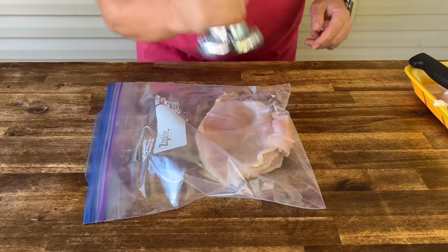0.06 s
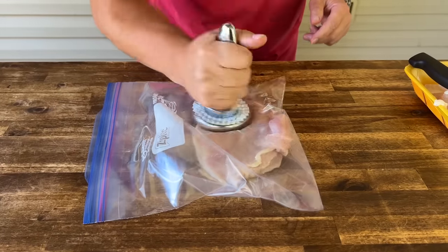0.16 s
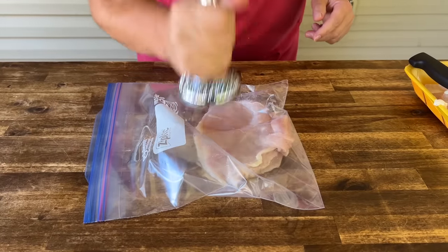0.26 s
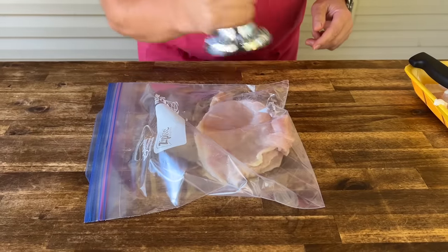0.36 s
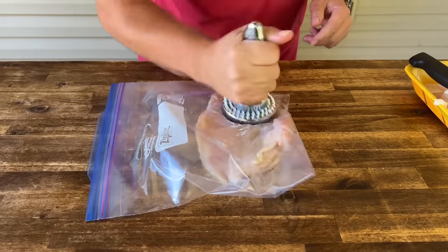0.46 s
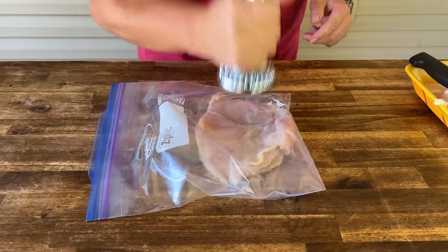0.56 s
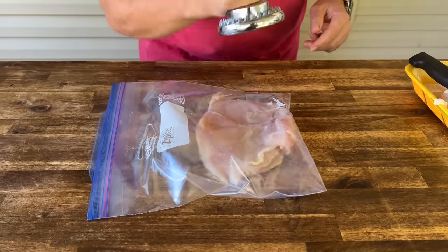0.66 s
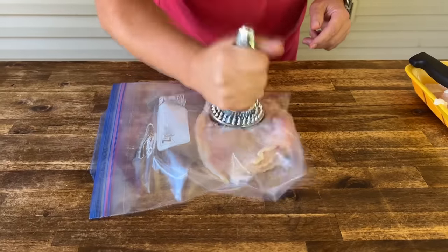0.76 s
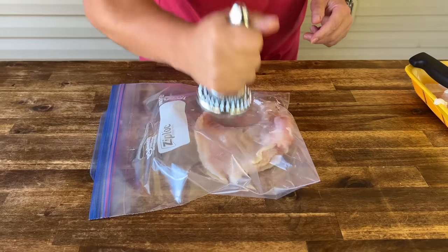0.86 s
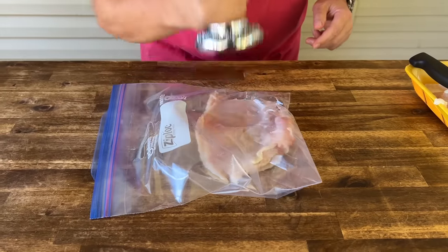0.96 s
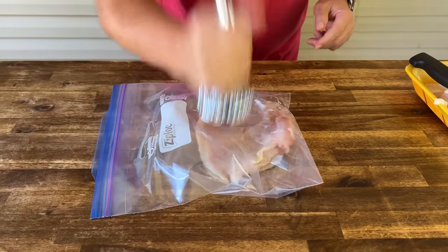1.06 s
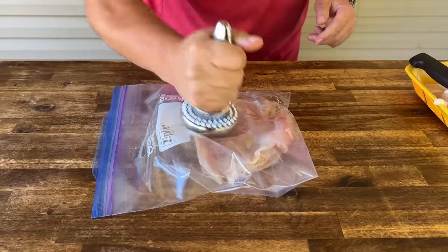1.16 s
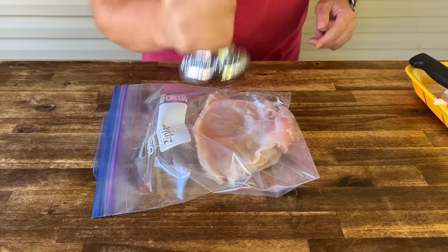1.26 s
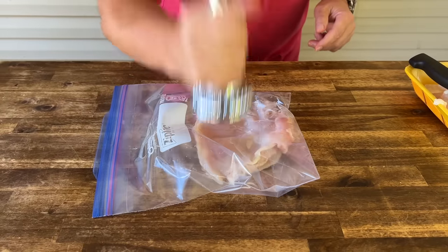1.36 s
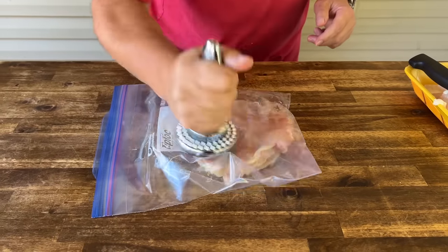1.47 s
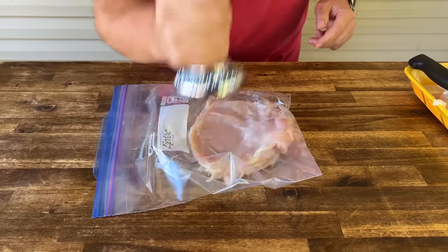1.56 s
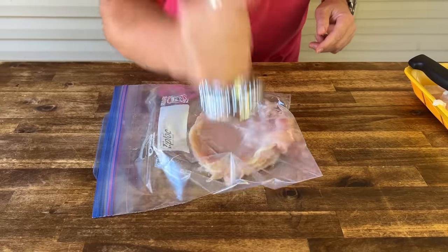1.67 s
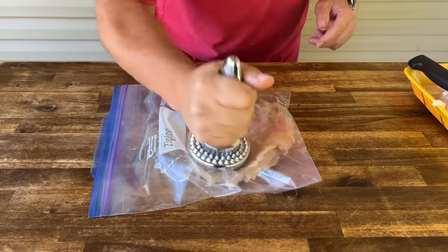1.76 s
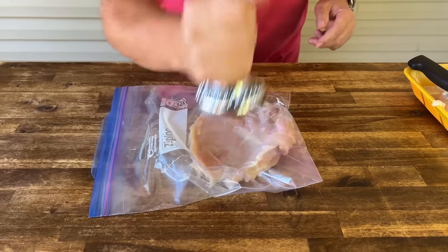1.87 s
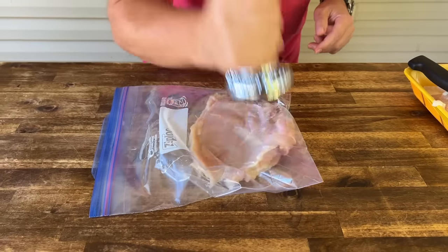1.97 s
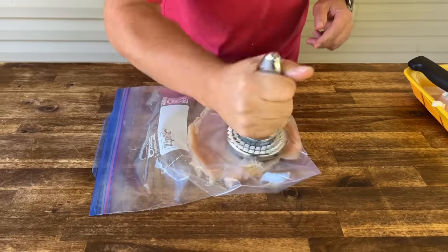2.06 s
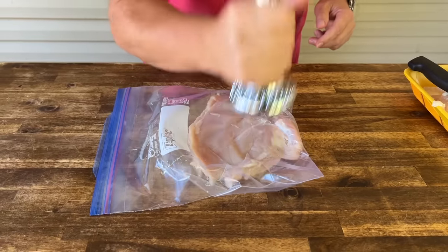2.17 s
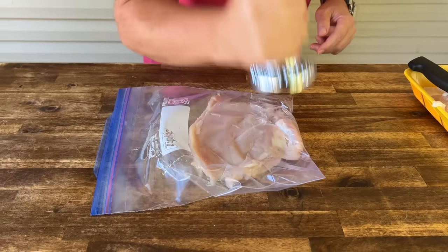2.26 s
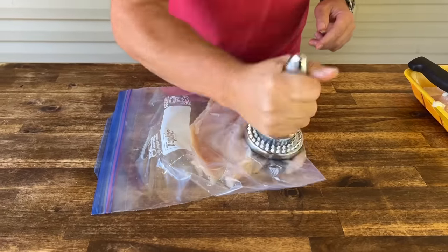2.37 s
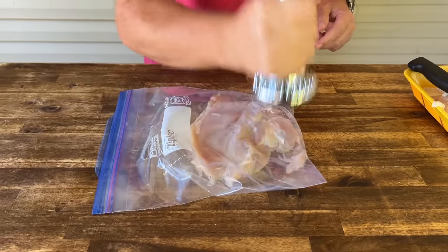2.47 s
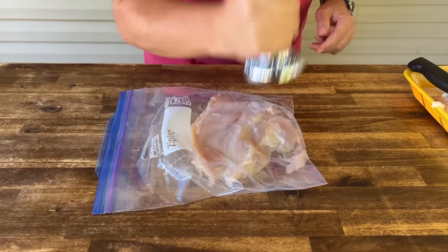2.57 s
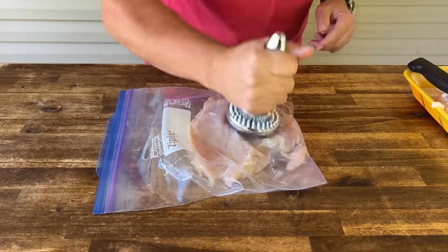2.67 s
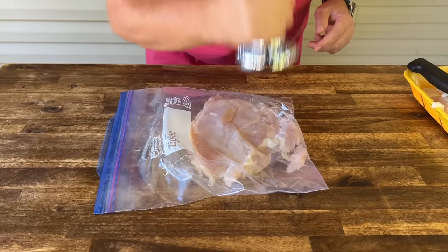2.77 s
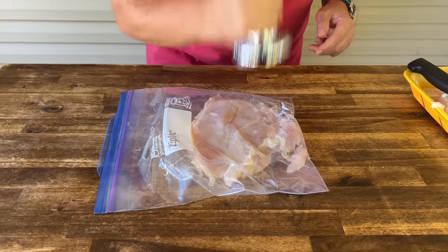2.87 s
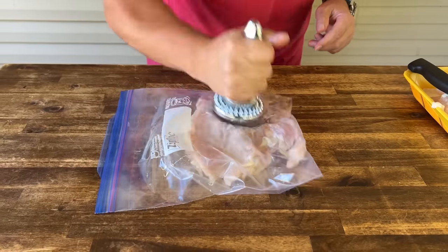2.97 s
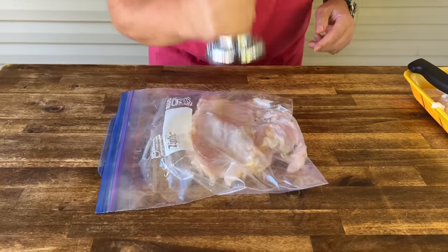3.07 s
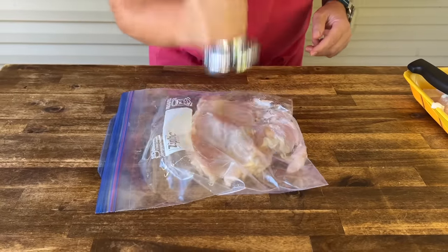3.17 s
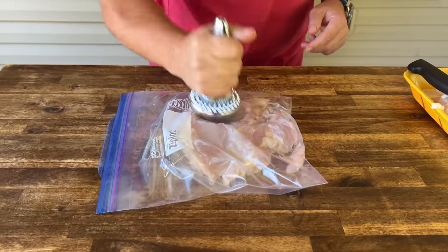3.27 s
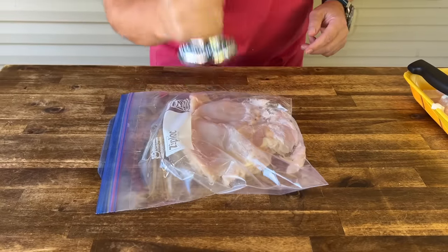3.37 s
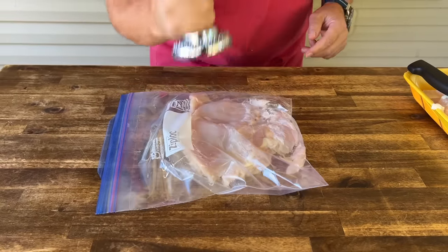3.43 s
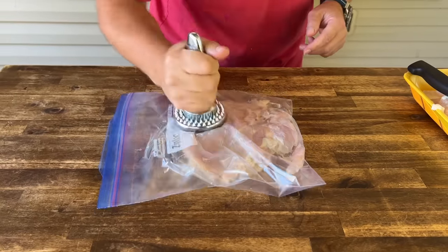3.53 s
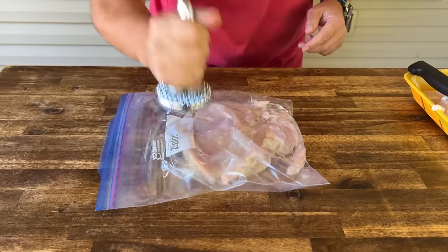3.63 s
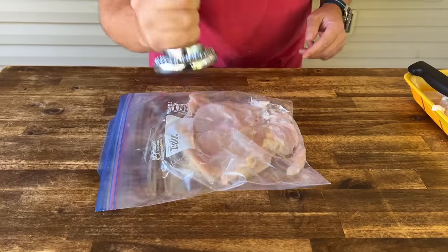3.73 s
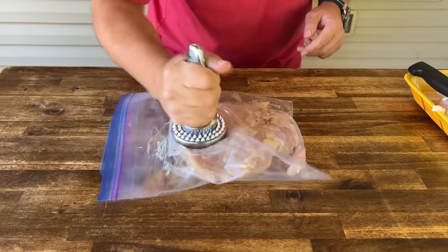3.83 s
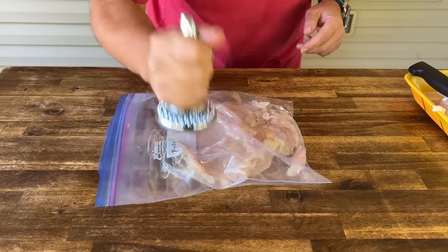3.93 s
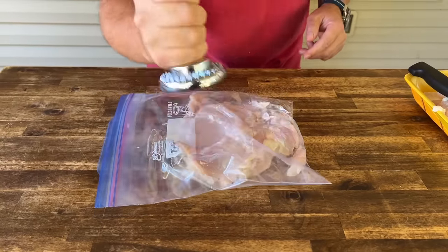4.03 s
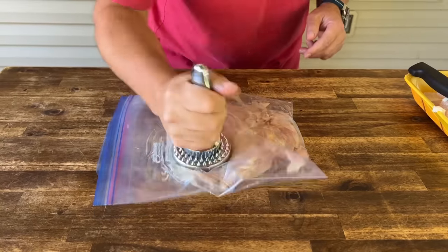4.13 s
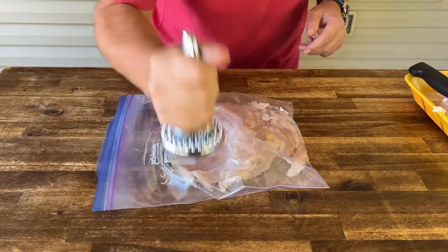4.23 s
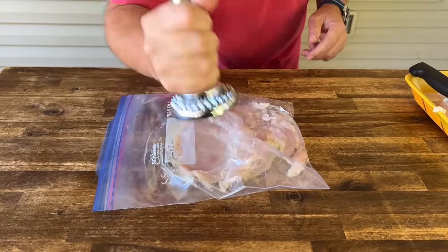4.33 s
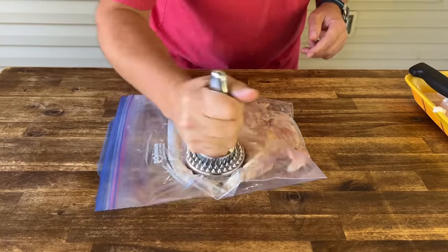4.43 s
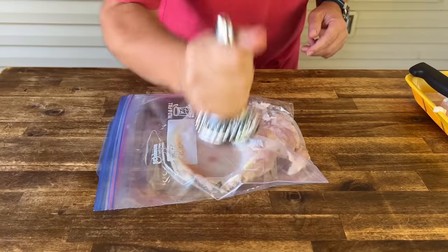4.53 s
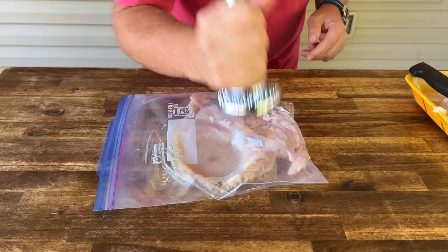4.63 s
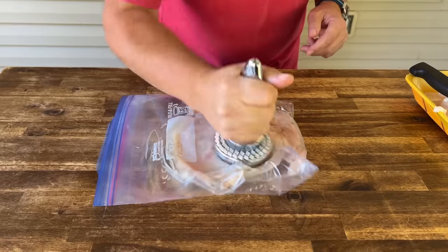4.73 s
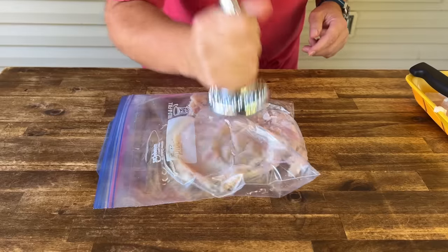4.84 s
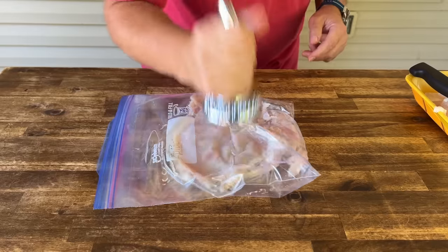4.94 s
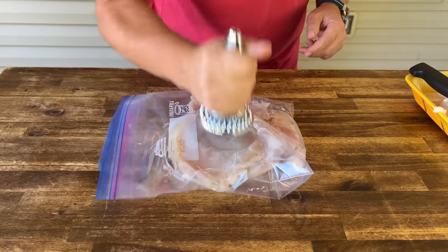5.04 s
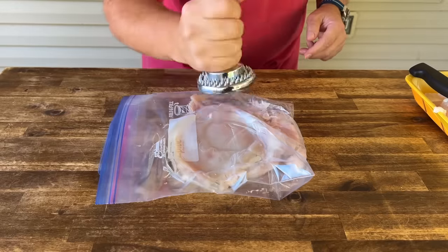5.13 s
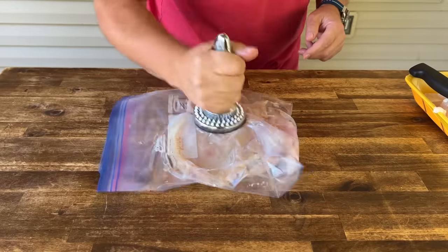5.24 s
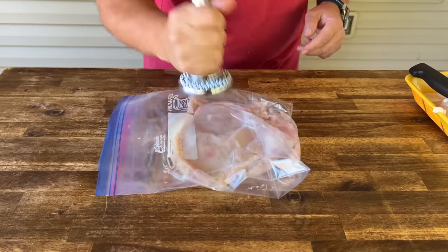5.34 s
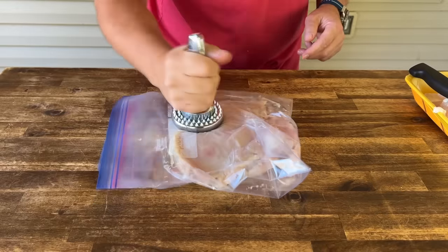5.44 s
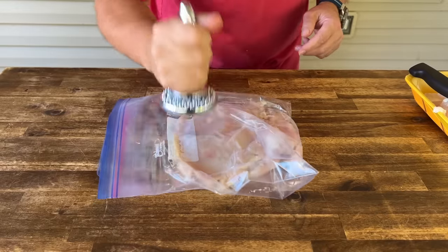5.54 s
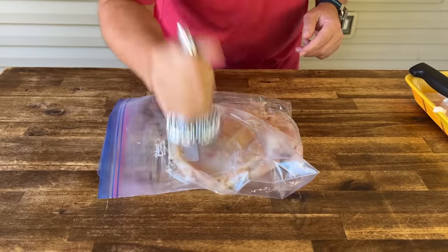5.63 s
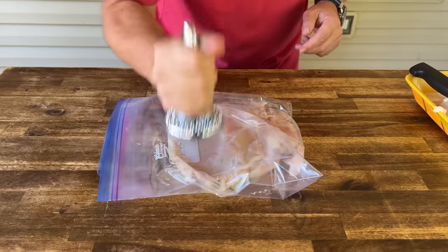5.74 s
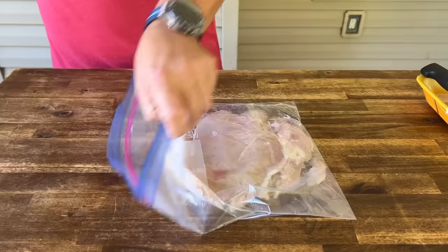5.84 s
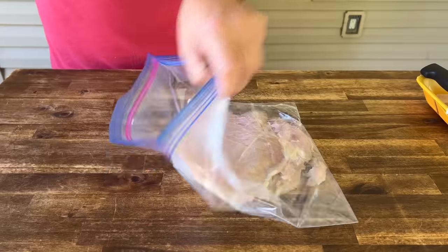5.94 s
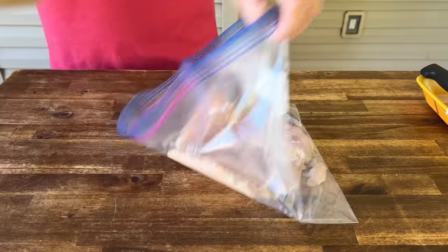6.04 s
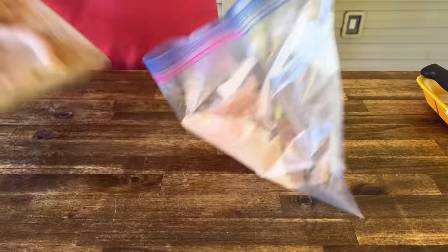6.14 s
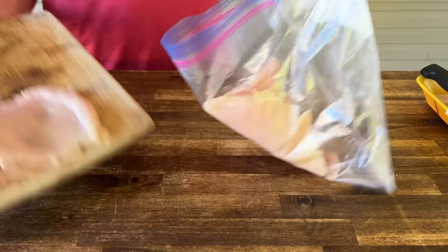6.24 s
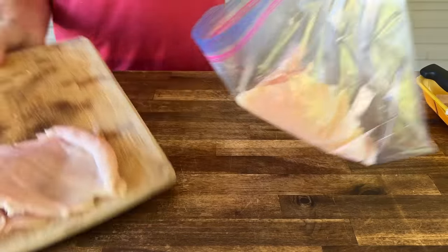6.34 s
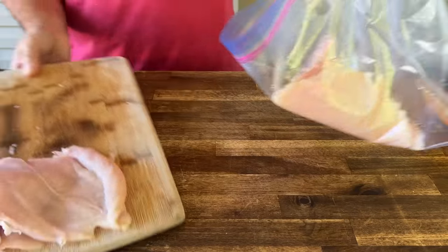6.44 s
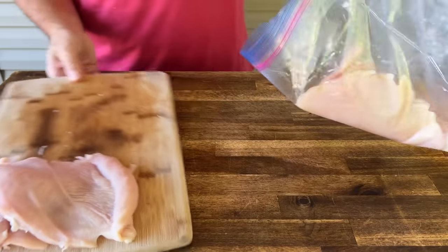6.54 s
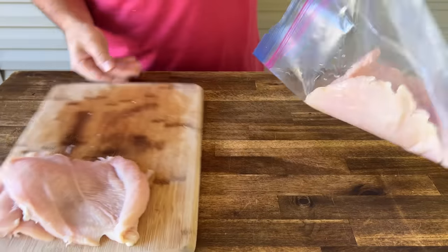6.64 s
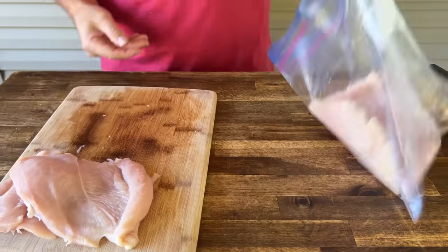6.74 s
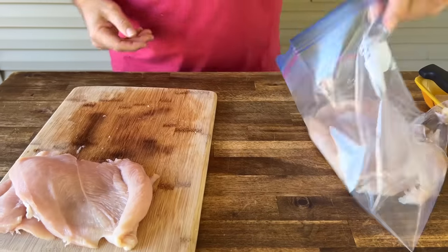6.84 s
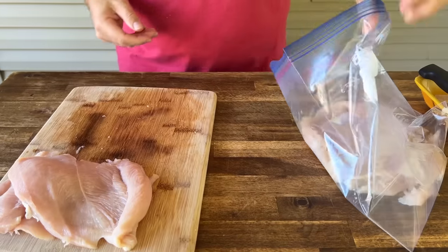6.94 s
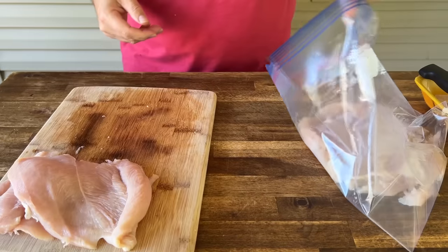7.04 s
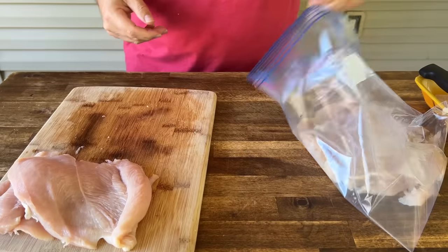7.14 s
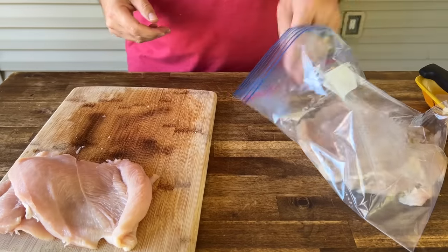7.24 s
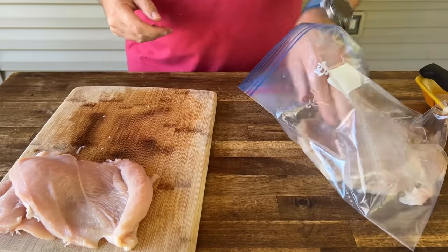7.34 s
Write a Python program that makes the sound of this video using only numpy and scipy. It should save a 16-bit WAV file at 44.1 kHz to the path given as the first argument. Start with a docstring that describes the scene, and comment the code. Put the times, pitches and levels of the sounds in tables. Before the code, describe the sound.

Steady heavy wet thuds with crisp plastic slaps on a resonant wooden table outdoors, cut off by bag rustling and wooden board knocks.

```python
"""Outdoor air throughout; a table already humming, then a steel mallet pounds bagged chicken on it 20 times.
Each blow rustles film, pops trapped air, slaps wet meat and heaves the table; porch and yard echo (noise tails).
From 5.8 s the bag is peeled off: dense noise buckles swell with each stroke, with snaps and ticks on top.
From 6.3 s a wooden cutting board is set down in three knocks: noise clacks, a dense clatter and table thuds.
From 6.6 s two faint far whistles: sagging sine pairs."""
import sys
import numpy as np
from scipy import signal
from scipy.fft import rfft, irfft, next_fast_len
from scipy.io import wavfile
from scipy.ndimage import uniform_filter1d

SR = 44100
rng = np.random.default_rng(int(sys.argv[2]) if len(sys.argv) > 2 else 0)


def transcribe(u):
    """Save the signal u as a 16-bit wav file named by the first command-line argument.

    u: samples, shape (n,) or (channels, n), limited to [-1, 1]; the rate is SR.
    q: integer samples, one column per channel.
    """
    v = np.clip(np.atleast_2d(u).T, -1, 1)
    q = np.round(v * 32767).astype(np.int16)
    wavfile.write(sys.argv[1], SR, q)


N = 326340  # 7.4 s
POUNDING_END_S = 5.835


def amp(db):
    """Decibels to linear gain."""
    return 10 ** (np.asarray(db) / 20)


def unit(x):
    """Scale to rms 1."""
    return x / np.sqrt(np.mean(x ** 2) + 1e-20)


def along(points, hz):
    """Interpolate (hz, value) points on a log frequency axis."""
    f, v = np.transpose(points)
    return np.interp(np.log(hz + 1), np.log(f + 1), v)


def shape(points):
    """Gain against frequency from (hz, db) points."""
    return lambda hz: amp(along(points, hz))


def cavity(centre_hz, q):
    """Gain of a broad resonance with steep skirts."""
    return lambda hz: 1 / (1 + (q * (hz / centre_hz - centre_hz / (hz + 1))) ** 2)


def filtered(x, response):
    """Multiply the spectrum of x by a complex response of frequency."""
    n = x.shape[-1]
    m = next_fast_len(n + 4096)
    hz = np.fft.rfftfreq(m, 1 / SR)
    return irfft(rfft(x, m) * response(hz), m)[..., :n]


def add(track, start_s, sound):
    """Mix a sound into the track."""
    start = max(round(start_s * SR), 0)
    part = track[:, start:start + sound.shape[-1]]
    part += sound[..., :part.shape[-1]]


def coloured(pair, gain, alike):
    """Two unrelated signals become left and right, with a colour and a likeness."""
    def weights(hz):
        turn = np.arccos(np.clip(along(alike, hz), -1, 1)) / 2
        return gain(hz) * np.array([np.cos(turn), np.sin(turn)])

    mid, side = filtered(pair, weights)
    return np.array([mid + side, mid - side])


# left-right likeness of near sources: [freq_hz, likeness (clipped at 1)]
NEAR_LIKENESS = [(200, 1), (700, 0.7957), (1500, .55), (5000, .5), (7500, 0.69), (11000, 1.0745)]


def burst(t, rise_s, fall_s, gain, spiky_db):
    """A cluster of tiny pops swells to t = 0 and dies; it has the energy of 5 ms at rms 1."""
    envelope = np.exp(np.minimum(t / rise_s, -t / fall_s))
    wander = unit(uniform_filter1d(rng.standard_normal(len(t)), size=12))
    pops = rng.standard_normal((2, len(t))) * amp(spiky_db * wander) * envelope
    return unit(coloured(pops, gain, NEAR_LIKENESS)) * np.sqrt(.005 * SR / len(t))


def thump(t, hz, delay_s, swell_s, fall_s):
    """The table heaves for just a few cycles, cresting at delay_s."""
    u = t - delay_s
    width = np.where(u < 0, swell_s, fall_s)
    return np.cos(2 * np.pi * hz * u) * np.exp(1 - np.hypot(1, u / width) ** 1.8)


# left-right likeness of diffuse sound: [freq_hz, likeness]
FAR_LIKENESS = [(120, 0.95), (400, 0.78), (1000, 0.16), (3000, 0.058), (7000, 0.1), (10000, 1)]


def tail(gain, t60, size):
    """Dense stereo ringing of unit energy before its colour; each frequency dies at its own speed."""
    hz, t, z = signal.stft(rng.standard_normal((2, size)), SR, nperseg=256)
    life_s = along(t60, hz)[:, None]
    decay = amp(-60 * t / life_s) * np.sqrt(2 * np.log(1000) / (life_s * SR))
    noise = signal.istft(z * decay, SR, nperseg=256)[1]
    return coloured(noise, gain, FAR_LIKENESS)


# outdoor background colour: [freq_hz, relative_density_db]
AIR_COLOUR = [(15, -39), (25, -10), (120, 2), (317, -13), (516, -12.5), (911, -19.5), (1520, -21.5),
              (2350, -27.5), (8590, -38.5), (9570, -66), (14400, -47.5), (16000, -53.5)]


def air():
    """Steady diffuse outdoor noise."""
    noise = rng.standard_normal((2, N))
    return amp(-49) * unit(coloured(noise, shape(AIR_COLOUR), FAR_LIKENESS))


# faint far whistles: [start_s, length_s, pitch_hz, level_db]
WHISTLE_NOTES = [(6.601, 0.078, 2450, -52), (7.08, 0.083, 2390, -57)]


def whistles():
    """Short thin notes sag 1.2 %, each with a weaker partial at 3/2 of its pitch."""
    out = np.zeros((2, N))
    for start_s, length_s, pitch_hz, level_db in WHISTLE_NOTES:
        u = np.linspace(0, 1, int(length_s * SR))
        phase = 2 * np.pi * np.cumsum(pitch_hz * (1 - .012 * u)) / SR
        envelope = np.sqrt(np.abs(np.sin(np.pi * u)))
        add(out, start_s, amp(level_db) * envelope * (np.sin(phase) + .35 * np.sin(3 / 2 * phase)))
    return out


# late yard echo: [freq_hz, level_db]
YARD_COLOUR = [(30, -11.5), (90, -12.5), (130, -17), (300, -13.5), (600, -18), (800, -21), (1100, -19),
               (3000, -28), (8000, -29), (14000, -47)]
# its decay: [freq_hz, t60_s]
YARD_DECAY = [(60, 3.4), (300, 3.3), (1000, 1.1), (4000, 0.48), (12000, 0.32)]


def yard(radiated):
    """Faint, slow echo of a source with the given radiated gain."""
    return tail(lambda hz: radiated(hz) * shape(YARD_COLOUR)(hz), YARD_DECAY, size=32768)


# early echo of wall and roof: [freq_hz, level_db]
PORCH_COLOUR = [(60, -11), (150, -18), (300, -7.5), (600, -12), (800, -6.5), (1050, -8.5), (2000, -6),
                (6000, -5), (9000, -13.5), (12000, -15), (16000, -16)]
# its decay: [freq_hz, t60_s]
PORCH_DECAY = [(100, .5), (400, 0.82), (1000, 0.22), (3000, 0.24), (8000, 0.25), (14000, 0.15)]


def porch(radiated=lambda hz: 1):
    """Quick echo of a source with the given radiated gain; flat gives an impulse response."""
    return tail(lambda hz: radiated(hz) * shape(PORCH_COLOUR)(hz), PORCH_DECAY, size=12288)


def broad_colour(x):
    """A short sound's spectrum smoothed over about half an octave, from its left channel."""
    energy = np.cumsum(np.abs(rfft(x[0])) ** 2)
    bins = np.arange(len(energy))

    def gain(hz):
        k = hz * x.shape[-1] / SR
        half = k / 6 + 1
        band = np.interp(k + half, bins, energy) - np.interp(k - half, bins, energy)
        return np.sqrt(np.abs(band) / (2 * half))
    return gain


# board meeting table: [start_s, clack_db, clack_top_hz, clatter_db, thud_db]
BOARD_KNOCKS = [(6.3256, -18.5, 3540, 12, -34), (6.3946, -17.3, 4450, 18.5, -27),
                (6.6726, -13.5, 6000, 10, -20.5)]
# contact colour: [freq_hz, relative_density_db]
CLACK_COLOUR = [(150, -17), (350, -4), (1000, -2.5), (1700, -8.5), (2500, -7), (3300, -14), (4200, -15),
                (7000, -21)]
# dense board modes: [freq_hz, relative_level_db]
BOARD_COLOUR = [(100, -26), (280, 11.5), (380, 3), (450, 4.5), (630, -2), (800, 7), (1000, -1), (1400, 4),
                (2000, -16.5), (2700, -15.5), (4000, -29.5), (7000, -43)]
# their decay: [freq_hz, t60_s]
BOARD_DECAY = [(250, 0.19), (1000, 0.085), (3000, .07)]


def board():
    """The cutting board lands corner by corner, then drops flat; harder contact is brighter."""
    out = np.zeros((2, N))
    t = np.arange(8192) / SR - .005
    for start_s, clack_db, top_hz, clatter_db, thud_db in BOARD_KNOCKS:
        contact = lambda hz: shape(CLACK_COLOUR)(hz) / (1 + (hz / top_hz) ** 5)
        clack = burst(t, .00073, .0035, contact, spiky_db=3.5)
        clatter = tail(shape(BOARD_COLOUR), BOARD_DECAY, size=12288)
        thud = thump(t, hz=90, delay_s=.017, swell_s=.0044, fall_s=.013)
        add(out, start_s + t[0], amp(clack_db) * clack)
        add(out, start_s, amp(clatter_db) * clatter)
        add(out, start_s + t[0], amp(thud_db) * thud)
    return out


# bag lifted, shifted, laid down, let go: [crest_s, rise_s, fall_s, crumple_db, crackle_db]
HAND_STROKES = [(6.085, .08, .085, -31.5, -43.5), (6.59, .02, .04, -45, -66), (6.81, .04, .028, -29, -37),
                (7.34, .06, .09, -48, -48.5)]
STILL_DB = -70  # the held bag never quite rests


def flexing():
    """Gains of crumple and crackle: each hand stroke swells to its crest and dies away."""
    t = np.arange(N) / SR
    gains = np.full((2, N), amp(STILL_DB))
    for crest_s, rise_s, fall_s, crumple_db, crackle_db in HAND_STROKES:
        swell = np.exp(np.minimum((t - crest_s) / rise_s, (crest_s - t) / fall_s))
        gains += amp([[crumple_db], [crackle_db]]) * swell
    return gains * (t > POUNDING_END_S)


def crinkles(level, spectrum, rate_hz, spread_db, hiss):
    """Countless little buckles of the film, a few much larger than the rest."""
    size_db = spread_db * np.minimum(rng.exponential(size=N), 4)
    hits = (rng.random(N) < rate_hz / SR) * amp(size_db)
    buckles = signal.lfilter([1], [1, -np.exp(-1 / (.0004 * SR))], hits)  # 0.4 ms decay
    pair = (unit(buckles) + hiss) * rng.standard_normal((2, N))
    return level * unit(coloured(pair, shape(spectrum), NEAR_LIKENESS))


# limp film colour: [freq_hz, relative_density_db]
CRUMPLE_COLOUR = [(120, -18), (300, 4), (500, -6), (950, 2), (1500, -6.5), (2300, -5), (3300, -16),
                  (4500, -13), (8000, -36)]
# stiff crease colour: [freq_hz, relative_density_db]
CRACKLE_COLOUR = [(1500, -38), (2400, -11), (3500, 1), (5000, 4.5), (6200, 3), (8500, 4.5), (11000, -4),
                  (13500, -8), (16000, 2)]
# loudest creases snapping over: [start_s, nominal_peak_db, body_re_peak_db]
CREASE_SNAPS = [(2.4634, -37.5, -17), (4.8282, -33, -9), (5.8412, -27, -22), (5.8526, -31, -8),
                (5.9533, -29.5, -3), (5.9989, -25, -13), (6.118, -17, -10), (6.1363, -27.5, -17),
                (6.334, -29, 2), (6.4007, -33, -6), (6.5058, -35, 1), (6.8105, -22, -8), (7.1767, -33, 1),
                (7.3332, -29, -1)]
TICK_RATE_HZ, TICK_BODY_DB = 24, -3  # small creases; body against peak
TICK_DB, TICK_FOLLOWS, TICK_SCATTER_DB = -11, .55, 3  # level follows crackle by about half


def bag():
    """The limp wet bag swishes and crackles; stiff creases snap, and small ones tick at random."""
    crumple, crackle = flexing()
    out = crinkles(crumple, CRUMPLE_COLOUR, rate_hz=1400, spread_db=3.5, hiss=.31)
    out += crinkles(crackle, CRACKLE_COLOUR, rate_hz=600, spread_db=5.5, hiss=.25)
    count = int(TICK_RATE_HZ * (N / SR - POUNDING_END_S))
    ticks_s = POUNDING_END_S + (np.arange(count) + rng.random(count)) / TICK_RATE_HZ
    crackle_db = 20 * np.log10(crackle[(ticks_s * SR).astype(int)] + 1e-9)
    ticks_db = TICK_DB + TICK_FOLLOWS * crackle_db + TICK_SCATTER_DB * rng.standard_normal(count)
    ticks = [(s, db, TICK_BODY_DB) for s, db in zip(ticks_s, ticks_db)]
    t = np.arange(2048) / SR - .005
    for start_s, peak_db, body_db in list(CREASE_SNAPS) + ticks:
        # offsets turn burst energy into nominal peak level
        snap = amp(peak_db - 9) * burst(t, .00017, .0012, shape(CRACKLE_COLOUR), spiky_db=6)
        snap += amp(peak_db + body_db - 2.5) * burst(t, .0003, .0031, shape(CRUMPLE_COLOUR), spiky_db=0)
        add(out, start_s + t[0], snap)
    return out


def ring(modes, length_s, attack_s, scatter_db):
    """Struck modes decay as sines, at new strengths and phases on each call."""
    t = np.arange(int(length_s * SR)) / SR
    hz, db, t60_s = np.transpose(modes)[:, :, None]
    level = amp(db + scatter_db * rng.standard_normal(hz.shape) - 60 * t / t60_s)
    sines = np.sin(2 * np.pi * (hz * t + rng.random(hz.shape)))
    return (level * sines).sum(0) * (1 - np.exp(-t / attack_s))


# table top modes: [freq_hz, relative_level_db, t60_s]
TABLE_MODES = [(87.96, -4, .9), (98.17, -6.5, 1.1), (167.5, -11.5, 1.38), (255, -19, 1.2), (298, -17, 0.58),
               (319, -7.5, .3), (439, -21, 0.7), (507, -14, 0.22), (822, -4.5, 0.13), (944, -14.5, 0.11),
               (1260, -15, .25)]


def earlier_ring():
    """The four lowest table modes still hum from a previous blow."""
    return amp(-26) * ring(TABLE_MODES[:4], length_s=1, attack_s=.004, scatter_db=2.5)


def table(force_db, smack_db):
    """The slow push drives the low modes of the table top, the quick smack its high ones."""
    drive = [(250, force_db - 20.5), (500, smack_db - 7)]
    modes = [(hz, db + along(drive, hz), t60_s) for hz, db, t60_s in TABLE_MODES]
    return ring(modes, length_s=.81, attack_s=.001, scatter_db=2.0)


# blows: [start_s, force_db, crack_db, smack_db, pop_db, pop_hz, squelch_db]
MALLET_BLOWS = [(0.1497, -2.5, -13.5, -12.5, -23, 2100, -10.5),
                (0.4568, -4.5, -17, -11.5, -15.5, 2050, -16.5),
                (0.776, -4.5, -20.5, -9, -19.5, 2900, -12.5), (1.0992, -3, -14, -15, -22.5, 2800, -13.5),
                (1.4146, -4.5, -17, -11.5, -18, 2400, -16),
                (1.7235, -3.5, -16.5, -10.5, -16.5, 2150, -16.5), (2.037, -6.5, -20, -24, -19, 2500, -22.5),
                (2.339, -2.5, -16.5, -23.5, -20, 2550, -11.5),
                (2.6337, -3.5, -16.5, -21, -17.5, 3200, -12.5), (2.93, -3, -18, -14, -23.5, 1900, -15.5),
                (3.2309, -2, -14.5, -18.5, -22, 2500, -10.5), (3.5301, -4.2, -18, -16, -19, 3100, -18),
                (3.8367, -5.5, -18.5, -18, -19.5, 2250, -18.5),
                (4.139, -4.3, -21.5, -16, -20.5, 2200, -11.5), (4.4274, -2.3, -20, -16.5, -19.5, 1900, -11),
                (4.7073, -4.7, -22.5, -14.5, -18.5, 2200, -23),
                (4.985, -3.2, -17.5, -25, -24.5, 2600, -17.5), (5.229, -9, -17, -18, -23.5, 2700, -14.5),
                (5.4439, -6.7, -23.5, -16.5, -26.5, 2400, -18), (5.669, -7, -23, -28, -26.5, 3400, -19.5)]
# film rustle colour: [freq_hz, relative_density_db]
RUSTLE_COLOUR = [(150, -13), (600, 4), (1200, 4), (2200, 3.5), (4000, -12), (8000, -4), (16000, -34)]
# film crack colour: [freq_hz, relative_density_db]
CRACK_COLOUR = [(1500, -36), (3000, -17.5), (4200, -3.5), (5300, -1.5), (6200, -3), (8000, 1), (11500, -7),
                (13500, -2.5), (15200, -3.5), (17000, -22)]
# wet squelch colour: [freq_hz, relative_density_db]
SQUELCH_COLOUR = [(80, 0.5), (200, -2), (330, -1.5), (480, -11.5), (700, -35), (2000, -42)]
# thick, wet meat smacks louder and touches the film sooner
TYPICAL_SMACK_DB, TOUCH_S, TOUCH_S_PER_DB = -17, .0075, .0003
RUSTLE_RE_POP_DB = -6  # film rustles with the air it traps
MEAN_SMACK_HZ, SMACK_SCATTER = 830, .05  # scatters are shares of the pitch, either way
MEAN_THUMP_HZ, THUMP_SCATTER, CREST_S = 106, .04, .0159  # crest after the crack
SMACK_Q, SMACK_Q_PER_S = 1.55, -.09  # sharpness at 0 s, and its drift


def mallet():
    """Film rustles, air pops, meat smacks (less pitched as pounding goes on), the table takes the weight."""
    out = np.zeros((2, N))
    lead_s = .025
    t = np.arange(4096) / SR - lead_s
    add(out, 0, earlier_ring())
    chances = rng.uniform(-1, 1, (len(MALLET_BLOWS), 2))
    for row, (smack_chance, thump_chance) in zip(MALLET_BLOWS, chances):
        start_s, force_db, crack_db, smack_db, pop_db, pop_hz, squelch_db = row
        touch_s = max(TOUCH_S + TOUCH_S_PER_DB * (smack_db - TYPICAL_SMACK_DB), .002)
        smack_hz = MEAN_SMACK_HZ * (1 + SMACK_SCATTER * smack_chance)
        thump_hz = MEAN_THUMP_HZ * (1 + THUMP_SCATTER * thump_chance)
        smack_gain = cavity(smack_hz, q=SMACK_Q + SMACK_Q_PER_S * start_s)
        rustle = burst(t + touch_s, .0005, touch_s + .003, shape(RUSTLE_COLOUR), spiky_db=5)
        blow = amp(pop_db + RUSTLE_RE_POP_DB) * rustle
        blow += amp(crack_db) * burst(t, .0014, .0018, shape(CRACK_COLOUR), spiky_db=5)
        blow += amp(pop_db) * burst(t, .0011, .0026, cavity(pop_hz, q=1.05), spiky_db=2)
        blow += amp(smack_db) * burst(t - .002, .0024, .0034, smack_gain, spiky_db=3)
        blow += amp(squelch_db) * burst(t - .004, .0023, .009, shape(SQUELCH_COLOUR), spiky_db=1)
        # the meat spreads the push, so the heave is slow
        blow += amp(force_db) * thump(t, thump_hz, CREST_S, swell_s=.0053, fall_s=.0088)
        add(out, start_s - lead_s, blow)
        add(out, start_s + .005, table(force_db, smack_db))
        radiated = broad_colour(blow)
        add(out, start_s + .009, porch(radiated))
        add(out, start_s + .025, yard(radiated))
    return out


def scene():
    """Pounding and its ring are cut off at POUNDING_END_S; bag and board handling gets a porch echo."""
    cut = np.interp(np.arange(N) / SR, [POUNDING_END_S - .01, POUNDING_END_S], [1, 0])
    handling = bag() + board()
    echo = signal.fftconvolve(handling[:1], porch(), axes=1)
    add(handling, .007, amp(-3.5) * echo)
    return air() + whistles() + handling + mallet() * cut


# left-right phase difference, positive where left leads: [freq_hz, lead_rad]
STEREO_PHASE = [(500, 0), (1900, .3), (3400, 1.2), (5500, 1.2), (7200, 0), (8500, -1.3), (10000, -3.1),
                (11300, -4.2), (13200, -6.3), (14800, -7.3), (15800, -9.2)]
# left-right level difference, positive where left is louder: [freq_hz, balance_db]
STEREO_BALANCE = [(100, 1.1), (300, 1.5), (1000, -.9), (2200, 0), (4200, 3.2), (7000, .7), (12000, 0)]
RUMBLE_CUT_HZ, TOP_HZ, CEILING = 38, 16300, .93


def record(dry):
    """Treble is out of step between left and right; rumble and top are cut, the highest peaks rounded."""
    def stereo(hz):
        sides = np.array([[.5], [-.5]])  # half of each difference per side
        turn = np.exp(1j * along(STEREO_PHASE, hz) * sides)
        balance = amp(along(STEREO_BALANCE, hz) * sides)
        return turn * balance * hz ** 2 / np.hypot(hz ** 2, RUMBLE_CUT_HZ ** 2)

    x = filtered(dry, stereo)
    x = x / (1 + np.abs(x / CEILING) ** 8) ** (1 / 8)
    return filtered(x, lambda hz: hz < TOP_HZ)


dry = scene()
out = record(dry)
transcribe(out)
```